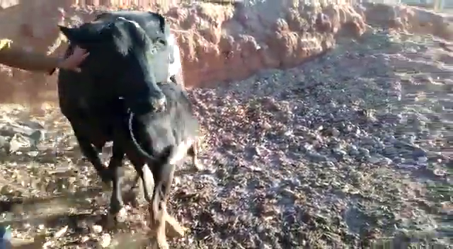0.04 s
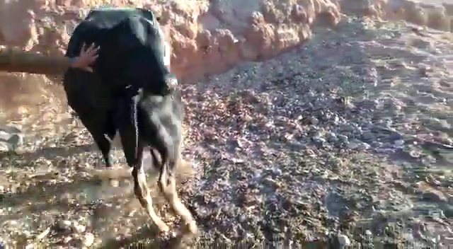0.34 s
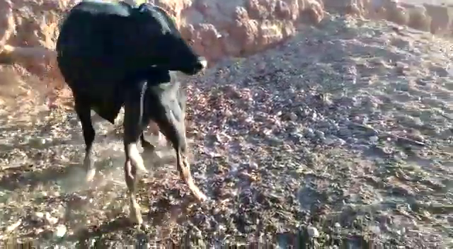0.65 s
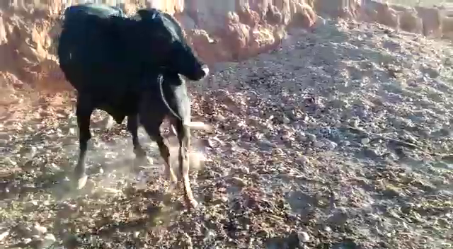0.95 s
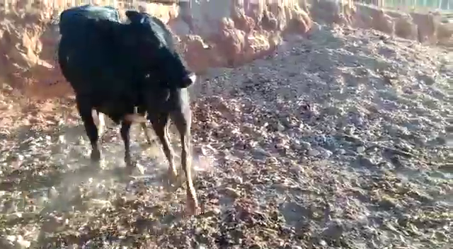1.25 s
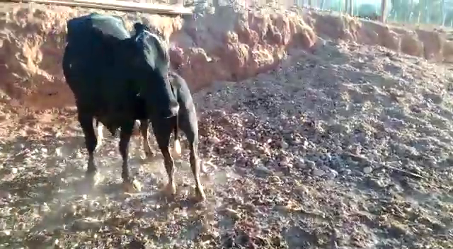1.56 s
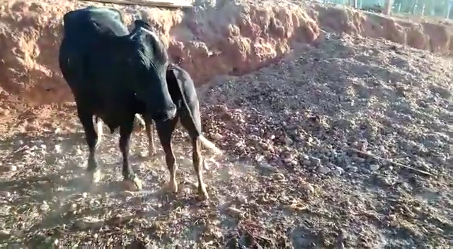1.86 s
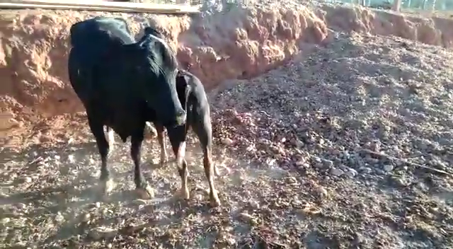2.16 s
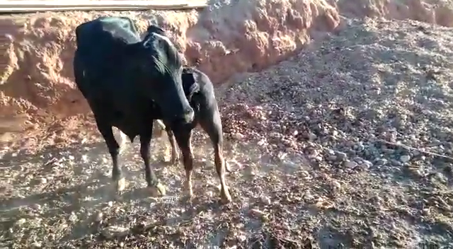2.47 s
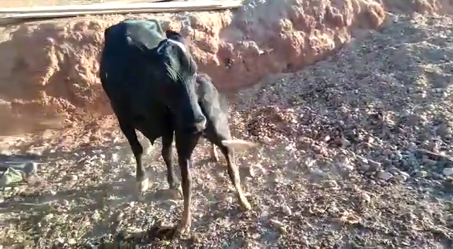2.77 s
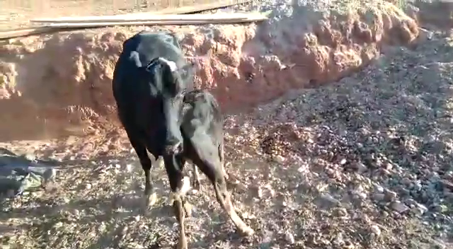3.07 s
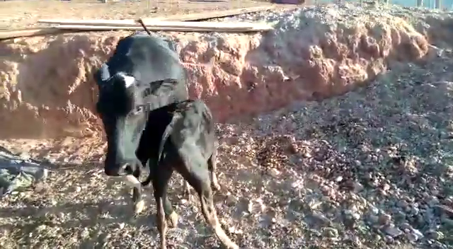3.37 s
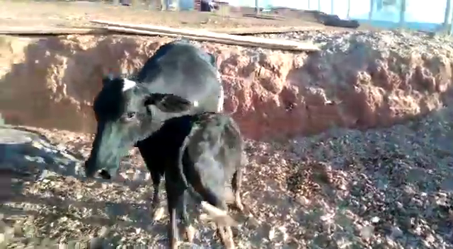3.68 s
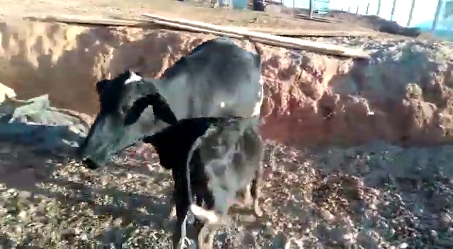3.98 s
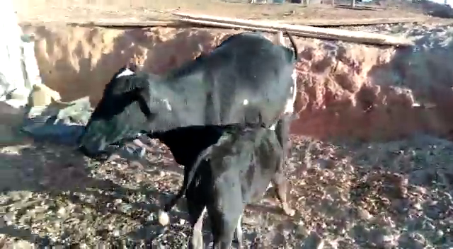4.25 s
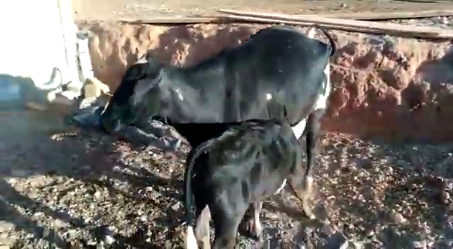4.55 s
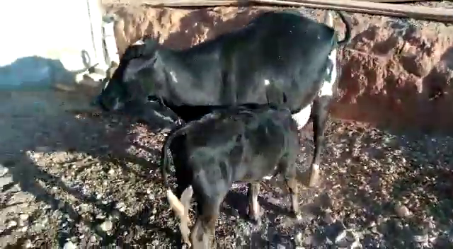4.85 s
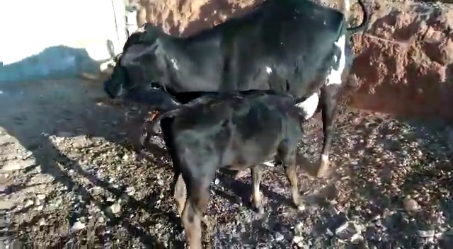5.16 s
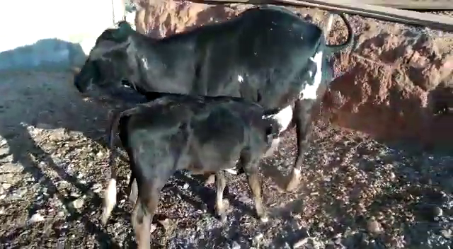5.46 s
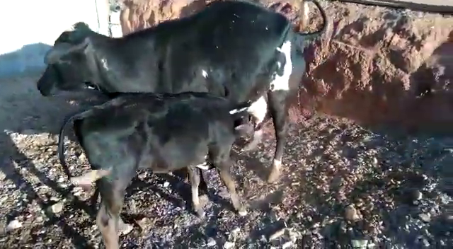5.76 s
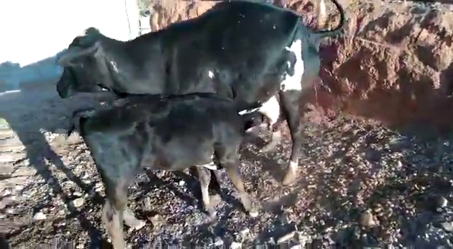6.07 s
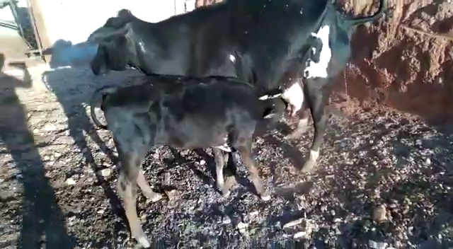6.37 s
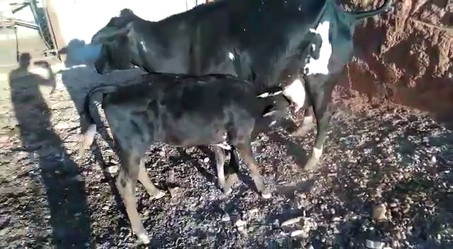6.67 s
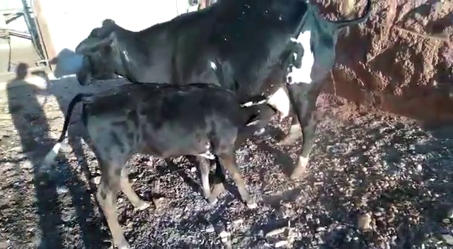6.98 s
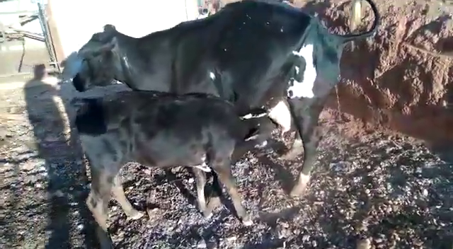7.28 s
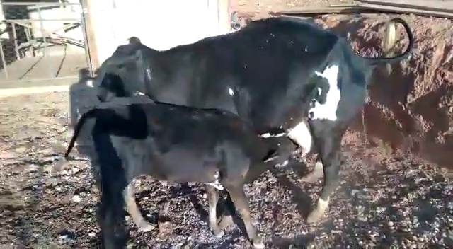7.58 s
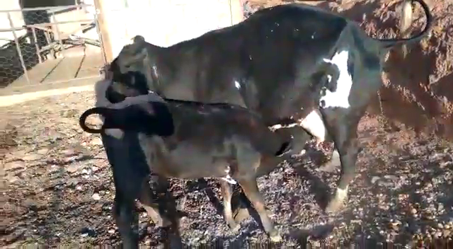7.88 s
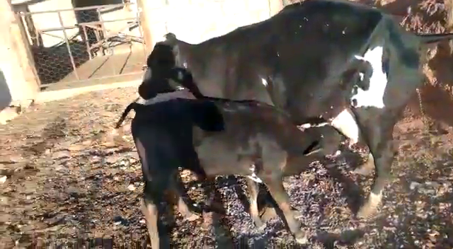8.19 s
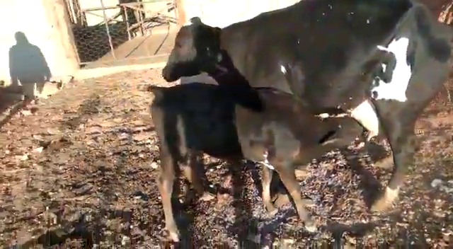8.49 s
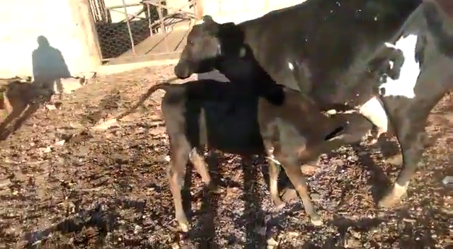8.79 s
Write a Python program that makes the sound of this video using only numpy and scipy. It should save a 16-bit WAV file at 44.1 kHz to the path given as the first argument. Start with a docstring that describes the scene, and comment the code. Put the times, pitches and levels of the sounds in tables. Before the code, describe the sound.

A cow and calf shuffle over crunching stones; late on, the cow lets out a single long, raspy moo with a shrill edge.

```python
"""Gravel grinds, crackles and snaps up close as a cow and her calf shuffle round a corral.
Hooves drag the stones against each other, dull thumps shake the microphone, a bird whistles far off.
Then the cow hums low through her nose and pushes out one long, hoarse moo: rough vocal-fold pulses
ring her throat and break from register to register, with a second, shrill vibration riding on top."""
import sys
import numpy as np
from scipy import signal
from scipy.fft import rfft, irfft
from scipy.io import wavfile
from scipy.ndimage import uniform_filter1d

SR = 44100
rng = np.random.default_rng(int(sys.argv[2]) if len(sys.argv) > 2 else 0)


def dump_mix(stems):
    """Bounce the given channels to the path in sys.argv[1] as a 16-bit WAV at rate SR."""
    frames = np.atleast_2d(stems).T  # one column per channel
    limited = np.clip(frames, -1, 1)  # hard clip at full scale
    pcm = np.round(limited * 32767).astype(np.int16)
    wavfile.write(sys.argv[1], SR, pcm)


N = 389403
TIME = np.arange(N) / SR

# open-air bed: f/Hz, level/dB
AIR_EQ = [(25, -8.5), (70, 17), (200, -18.5), (400, -27), (1500, -33), (3000, -69), (16000, -49)]
# rumble on the microphone: t/s, level/dB
RUMBLE_LEVELS = [(1.3, -49), (1.6, -55), (2.2, -46.5), (4.3, -52), (5.5, -46), (8.2, -52), (8.7, -49)]
# distant bird: t/s, length/s, first f/Hz, last f/Hz, level/dB, roughness/0-1
WHISTLES = [(0.247, 0.92, 1985, 1791, -47.5, 0.35), (1.651, 0.03, 1980, 1730, -38, .7),
            (1.714, 0.063, 1353, 1367, -37.5, 0.65), (1.876, 0.09, 1305, 1290, -38.5, 0.8),
            (3.76, .2, 3220, 3360, -52, .4)]
# dull thumps: t/s, level/dB
THUMPS = [(.141, -23.5), (.297, -31), (0.399, -33), (0.429, -27.5), (0.876, -38), (0.944, -35),
          (1.078, -28), (2.073, -33), (2.243, -22.5), (2.359, -23), (2.499, -26.5), (2.603, -26),
          (2.692, -23.5), (2.841, -26), (3.098, -32), (3.165, -29.5), (3.222, -29.5), (3.373, -32),
          (3.412, -29), (3.702, -25), (3.784, -31.5), (3.874, -26), (4.305, -32), (4.823, -22),
          (4.882, -29), (4.954, -26), (5.049, -21), (5.158, -26), (5.984, -24.5), (6.041, -25),
          (6.315, -23.5), (6.35, -26.5), (6.768, -28), (6.82, -24.5), (6.843, -23), (6.902, -23),
          (6.947, -24), (6.995, -26), (7.042, -27), (7.607, -28.5), (7.699, -23), (7.914, -33),
          (7.973, -24.5), (8.578, -32.5)]

# a hoof bears down and drags: t/s, length/s, grind level/dB, crunch level/dB
HOOF_DRAGS = [(0, 1.43, -44.5, -44.5), (0.164, 0.14, -43, -37.5), (1.549, 0.0076, -42.5, -49.5),
              (1.875, 0.17, -42.5, -61), (2.025, 0.27, -46.5, -55), (2.646, 0.16, -48.5, -47.5),
              (2.828, 0.18, -43.5, -51.5), (3.219, 0.11, -48.5, -58.5), (3.523, 0.027, -60, -44),
              (3.66, 0.43, -51, -46.5), (3.844, 0.039, -46, -48.5), (4.208, 6.5, -49, -44.5),
              (4.668, 0.48, -67, -47), (5.399, 0.11, -45.5, -43.5), (8.206, 0.6, -48, -41.5)]
# tone of grinding stones, crunching pebbles and fizzing grit: f/Hz, level/dB
GRIND_EQ = [(200, -14), (450, -5), (700, -4), (1450, 4.5), (1950, 1.5), (2600, -57), (5000, -28),
            (9000, -62)]
CRUNCH_EQ = [(450, -8), (700, -5.5), (2000, -0.5), (3200, -3), (5500, -1), (7200, -4.5), (10000, -14),
             (16000, -66)]
FIZZ_EQ = [(5000, -25), (8500, -5), (11000, -3.5), (14000, 0), (15800, -1.5), (16300, -20)]
# ring of the stones underfoot: t/s, f/Hz
STONE_RING = [(2.8, 6750), (5.1, 3780), (5.9, 4560), (8.7, 3980)]
# high gritty fizz relative to the crunch; it goes dull from about 1.6 to 3.5 s: t/s, level/dB
FIZZ_LEVELS = [(1.57, -4), (1.7, -15), (3.45, -17), (3.55, -3), (5, -5), (6.3, -1.5), (8.3, -7)]
# hoof scuffs: t/s, length/s, level/dB, centre f/Hz
SCUFFS = [(0.526, 0.08, -31.5, 2290), (0.772, 0.0086, -30, 1990), (1.118, 0.047, -36.5, 1600),
          (1.223, 0.011, -34, 2080), (3.013, .012, -37.5, 1400), (3.3, 0.015, -38, 1120),
          (3.642, 0.046, -33, 1160), (3.969, 0.035, -34.5, 1720), (4.861, 0.0075, -27.5, 3250),
          (5.127, 0.019, -30, 3800), (5.167, 0.0051, -29, 3120), (5.195, 0.023, -32.5, 3440),
          (5.266, 0.0041, -27.5, 3450), (5.289, 0.0085, -32, 3000), (6.225, 0.01, -26, 3380),
          (6.649, .013, -30, 3150), (8.109, 0.051, -26, 5700), (8.72, 0.028, -28.5, 3530)]
# stones snapping: t/s, dry peak level/dB, centre f/Hz
SNAPS = [(.0605, -11, 5700), (.1725, -13, 4000), (.584, -17, 1800), (.72, -15, 7900), (.804, -20, 1600),
         (1.041, -21, 2600), (1.115, -20, 1400), (1.555, -24, 1800), (2.152, -14, 1250), (2.861, -22, 1800),
         (2.903, -21, 1400), (3.525, -22, 10500), (3.656, -19, 1000), (4.683, -18, 4000),
         (4.861, -19, 5300), (5.263, -18, 3300), (5.927, -4, 12000), (7.818, -18, 4500), (7.861, -17, 5300),
         (8.052, -17, 5300), (8.504, -15, 4000), (8.535, -17, 4000)]

# closed-mouth hum: t/s, pitch f/Hz, level/dB
HUM_CURVE = [(5.4, 58.7, -57), (5.801, 61.46, -45.5), (6.15, 63.9, -61)]
# tone of the nose and of the throat: f/Hz, level/dB
NOSE_EQ = [(60, -12), (125, 11.5), (350, -6), (860, 5), (1100, -52)]
THROAT_EQ = [(150, -27.5), (260, -19), (350, -52), (500, -14), (570, 1), (700, -2.5), (930, 4.5),
             (1170, 5.5), (1330, -7.5), (1520, 7), (1710, -5.5), (1880, 2), (2200, -11.5), (3200, -23.5),
             (6000, -75)]
# upper throat resonances that ring when she strains: f/Hz, width/Hz, level/dB
BRASS_FORMANTS = [(1860, 110, 6), (2040, 80, 5), (2433, 85, 0), (3100, 83, -6)]
# registers the voice breaks into:
# t/s, top pitch f/Hz, second oscillator/pitch, roughness/0-1, sideband level/dB, brass level/dB
REGISTERS = [(6.13, 290, 4.15, .9, -15, -28), (6.3, 322, 3.74, .25, -12, -19), (6.42, 279, 4, .25, -8, -8),
             (6.475, 285, 4.4, .9, -6, -13), (6.505, 291, 3.99, .08, -13, -14),
             (6.57, 287, 3.7, .58, -2, -14), (6.81, 278, 3.4, .58, -7, -20),
             (7.02, 277, 3.53, .42, -1, -21), (7.3, 269, 3.55, .47, -7, -21),
             (7.44, 255, 4.68, .7, -9, -20)]
# lines around the second oscillator: offset/half-pitch steps, level/dB
SIDEBANDS = [(-3, -8), (-1, -10), (1, 0), (2, -12), (4, -6)]

EDGE_HZ = 16300
MOO_START_S, MOO_END_S, BUILD_S, LET_GO_S = 6.14, 7.61, .26, .17  # one push: build, hold, let go


def gain_of(db):
    """Decibels to amplitude."""
    return 10 ** (np.asarray(db) / 20)


def unit_rms(x):
    """Scales to rms 1."""
    return x / np.sqrt(np.mean(x ** 2) + 1e-20)


def follow(rows, t):
    """Reads each column of a breakpoint curve at t."""
    s, *columns = np.transpose(rows)
    return [np.interp(t, s, c) for c in columns]


def add(mix, s, sound):
    """Mixes a sound in at s seconds."""
    part = mix[max(round(s * SR), 0):][:len(sound)]
    part += sound[:len(part)]


def eq(x, points):
    """Minimum-phase EQ through the (f/Hz, level/dB) points."""
    f, db = np.transpose(points)
    hz = abs(np.fft.fftfreq(4096, 1 / SR))
    log_gain = np.log(gain_of(np.interp(np.log(hz + 1), np.log(f), db)))
    taps = np.fft.ifft(np.exp(np.conj(signal.hilbert(log_gain)))).real
    return signal.oaconvolve(x, taps[:len(taps) // 2])[:len(x)]


def band(x, lo_hz, hi_hz, order=2):
    """Band-pass."""
    sos = signal.butter(order, [lo_hz, min(hi_hz, SR / 2 - 100)], "band", fs=SR, output="sos")
    return signal.sosfilt(sos, x)


def wander(size, rate_hz):
    """Smooth random modulation of rms 1."""
    hz = np.fft.rfftfreq(size, 1 / SR)
    return unit_rms(irfft(rfft(rng.standard_normal(size)) / (1 + (hz / rate_hz) ** 2), size))


def resonate(x, hz, width_hz):
    """A moving resonance of gain 1."""
    turn = np.exp(2j * np.pi * np.cumsum(hz) / SR)
    pole = np.exp(-np.pi * width_hz / SR)
    return 2 * (turn * signal.lfilter([1 - pole], [1, -pole], x / turn)).real


def yard(x, wet_db, t60):
    """Short reverb: scatter from the ground, the earth bank and the walls."""
    t = TIME[:SR // 2]
    echoes = rng.standard_normal(len(t)) * (rng.random(len(t)) < .1)
    tail = echoes * gain_of(-60 * t / t60) * (t > .002)
    return x + gain_of(wet_db) * signal.oaconvolve(x, tail / np.linalg.norm(tail))[:len(x)]


def air():
    """A faint open-air bed, with spells of small, rumbling knocks on the microphone."""
    knocks = rng.uniform(-1, 1, N) * (rng.random(N) < 26 / SR)
    lumps = unit_rms(knocks) + .35 * rng.standard_normal(N)
    spells = unit_rms(gain_of(6 * np.clip(wander(N, rate_hz=9), -2, 1)))
    rumble = unit_rms(band(lumps, 46, 160, order=3)) * gain_of(follow(RUMBLE_LEVELS, TIME)[0]) * spells
    return gain_of(-51) * unit_rms(eq(rng.standard_normal(N), AIR_EQ)) + rumble


def bird():
    """Thin gliding whistles and short rough notes from far away."""
    out = np.zeros(N)
    for s, length, first_hz, last_hz, db, rough in WHISTLES:
        size = int(length * SR)
        hz = np.linspace(first_hz, last_hz, size) * (1 + .035 * rough * wander(size, rate_hz=150))
        envelope = gain_of(db + 3 * wander(size, rate_hz=25)) * signal.windows.tukey(size, .2)
        add(out, s, envelope * np.sin(2 * np.pi * np.cumsum(hz) / SR))
    return yard(out, wet_db=-7, t60=.2)


def thumps():
    """Blunt pushes on the microphone, each with a little scrape and a ring that dives into the bass."""
    out, t = np.zeros(N), TIME[:SR // 5]
    swell = (1 - np.exp(-t / .002)) ** 2 * (np.exp(-t / .016) + .057 * np.exp(-t / .098))
    for s, db in THUMPS:
        start_hz, rest_hz = 295 * rng.uniform(.67, 1.26), 72 * rng.uniform(.89, 1.104)
        dive_s = rng.uniform(.0034, .0077)
        turns = np.cumsum(rest_hz + (start_hz - rest_hz) * np.exp(-t / dive_s)) / SR
        scrape = rng.uniform(.08, .3) * unit_rms(band(rng.standard_normal(len(t)), 130, 320, order=3))
        add(out, s, gain_of(db) * swell / swell.max() * (scrape - np.sin(2 * np.pi * turns)))
    return out


def hoof_pressure():
    """Grind and crunch levels in dB: stones catch at once, hold, and settle as the weight comes off."""
    bite_s, settle_db_per_s = .00036, 392
    power = gain_of([[-62], [-73]]) ** 2 * np.ones(N)  # grind and crunch under standing hooves
    for s, length, *levels_db in HOOF_DRAGS:
        t = np.arange(0, length + .5, 1 / SR)
        envelope = np.minimum(t / bite_s, 1) * gain_of(-settle_db_per_s * np.maximum(t - length, 0))
        for layer, db in zip(power, levels_db):
            add(layer, s, (gain_of(db) * envelope) ** 2)
    return 10 * np.log10(power)


def grains(per_s, spread_db, clump_db, wash_db, centre_hz):
    """Tiny stone contacts in clumps, each stone size with its own short ring, over a smooth wash."""
    hit_db = spread_db * np.minimum(rng.exponential(1, N), 4)
    hit_db += clump_db * np.clip(wander(N, rate_hz=100), -2, 2)
    clicks = gain_of(hit_db) * rng.choice([-1, 1], N) * (rng.random(N) < per_s / SR)
    stone_size = rng.integers(0, 20, N)
    out, t = np.zeros(N), TIME[:SR // 100]
    attack = 1 - np.exp(-t / .0005)
    for k, hz in enumerate(np.minimum(centre_hz * np.geomspace(.5, 2, 20), EDGE_HZ)):
        ring = np.sin(2 * np.pi * hz * t) * np.exp(-t * hz / 2)
        scratch = .32 * rng.standard_normal(len(t)) * np.exp(-t / .0027)
        out += signal.oaconvolve(clicks * (stone_size == k), unit_rms((ring + scratch) * attack))[:N]
    return unit_rms(out) + gain_of(wash_db) * rng.standard_normal(N)


def gravel():
    """Coarse stones grind, pebbles crunch, grit fizzes; one jerky hoof pressure drives them all."""
    grind_db, crunch_db = hoof_pressure()
    fizz_db = crunch_db + follow(FIZZ_LEVELS, TIME)[0]
    jerk = np.clip(wander(N, rate_hz=23), -2, 2)
    stones = grains(per_s=900, spread_db=2.5, clump_db=4.5, wash_db=1.5, centre_hz=1290)
    pebbles = grains(per_s=520, spread_db=3.7, clump_db=2, wash_db=-6, centre_hz=4330)
    grit = grains(per_s=580, spread_db=6, clump_db=-.5, wash_db=-12, centre_hz=11840)
    pebbles = eq(pebbles, CRUNCH_EQ)
    ring = resonate(pebbles, follow(STONE_RING, TIME)[0], width_hz=3950)
    grind = unit_rms(eq(stones, GRIND_EQ)) * gain_of(grind_db + 1.4 * jerk)
    crunch = unit_rms(pebbles + 10 * ring) * gain_of(crunch_db + 1.7 * jerk)
    fizz = unit_rms(eq(grit, FIZZ_EQ)) * gain_of(fizz_db + 3.2 * jerk)
    return yard(grind + crunch + fizz, wet_db=-7.5, t60=.31)


def scuffs():
    """A hoof shoves a handful of stones at once: a short, rattling band of noise."""
    out, spread = np.zeros(N), .38  # half-width / centre
    for s, length, db, hz in SCUFFS:
        u = TIME[:int(2 * length * SR)] / length
        rattle = rng.standard_normal(len(u)) * gain_of(6.1 * wander(len(u), rate_hz=170))
        rattle = unit_rms(band(rattle, hz * (1 - spread), hz * (1 + spread)))
        envelope = (1 - np.exp(-u / .041)) * np.exp(-u ** 2 * 1.13)
        add(out, s, gain_of(db) * rattle * envelope)
    return out


def snaps():
    """A stone cracks against another and settles for a few milliseconds."""
    out, t = np.zeros(N), TIME[:SR // 20]
    for s, db, hz in SNAPS:
        crack = .3 * rng.standard_normal(len(t)) * (np.exp(-t / .0007) + .22 * np.exp(-t / .006))
        crack[0] = 2  # hard transient
        snap = band(crack, hz / 1.35, hz * 1.4) + .04 * crack
        add(out, s, gain_of(db) * snap / abs(snap).max())
    return yard(out, wet_db=-9, t60=.12)


def hum():
    """Slow, even fold pulses heard through the nose, creeping up in pitch towards the moo."""
    t = np.arange(HUM_CURVE[0][0], HUM_CURVE[-1][0], 1 / SR)
    hz, db = follow(HUM_CURVE, t)
    turns = np.cumsum(hz * (1 + .0033 * wander(len(t), rate_hz=20))) / SR
    tone = sum(gain_of(follow(NOSE_EQ, k * hz)[0]) * np.cos(2 * np.pi * k * turns) for k in range(1, 19))
    out = np.zeros(N)
    add(out, t[0], gain_of(db) * unit_rms(tone) * signal.windows.tukey(len(t), .2))
    return out


def eased(u):
    """A smooth step from 0 to 1 as u goes from 0 to 1."""
    return np.sin(np.pi / 2 * np.clip(u, 0, 1)) ** 2


def moo_controls(t):
    """Strain lifts pitch and level; the pitch sags within a register and the folds rasp at each break."""
    slack_pitch, slack_rough, slack_db = .66, .7, -15  # with no strain; pitch as a share of the top
    sag_per_s, steady_s, slip_s = .06, .1, .016
    strain = eased((t - MOO_START_S) / BUILD_S) * eased((MOO_END_S - t) / LET_GO_S)
    breaks = [row[0] for row in REGISTERS[1:]]
    entry_s, top_hz, ratio, rough, sideband_db, brass_db = np.array(REGISTERS)[np.searchsorted(breaks, t)].T
    sag = sag_per_s * (t - entry_s)
    hz = top_hz * (1 - sag) * (slack_pitch + (1 - slack_pitch) * strain)
    second_hz = ratio * top_hz * (1 - sag / 2)
    to_break_s = np.min([abs(t - s) for s in breaks + [MOO_END_S - LET_GO_S]], axis=0)
    rough = rough + .17 * np.exp(-to_break_s / steady_s)
    rough = np.clip(slack_rough + (rough - slack_rough) * strain ** 2, 0, 1)
    fade = eased(1 - 2 * (MOO_END_S - t) / LET_GO_S)
    effort_db = -21.4 + slack_db * (1 - strain) - 3 * rough - 18 * fade
    controls = np.array([hz, second_hz, rough, sideband_db, brass_db, effort_db])
    return uniform_filter1d(controls, int(slip_s * SR), axis=1)


def vocal_folds(buzz, turns, rough):
    """Buzzing pulses, with chaotic slaps and a puff of noise about every second cycle."""
    size = len(turns)
    slaps = np.diff(np.floor(turns / 2 + .3 * wander(size, rate_hz=70)), prepend=0) > 0
    puffs = (.27 + np.exp(-(turns / 2 % 1))) * rng.standard_normal(size)
    rasp = unit_rms(unit_rms(slaps - slaps.mean()) + unit_rms(puffs))
    # the folds flutter unevenly, about every fourth cycle
    flutter = 1 + .45 * np.cos(2 * np.pi * (turns / 4 + .25 * wander(size, rate_hz=25)))
    return (.42 * buzz + (.1 + .75 * rough) * rasp) * flutter


def throat(drive, buzz, buzz_hz, second_hz, brass_db):
    """The throat never holds still: drifting resonances colour the folds, brassier as she strains."""
    drift = 1 + .013 * wander(len(drive), rate_hz=5.8)
    body = eq(drive, THROAT_EQ)
    shrill = np.interp(buzz_hz, [225, 265], [2, .4]) * resonate(body, second_hz * drift, width_hz=90)
    octave = 1.4 * resonate(body, 2.07 * buzz_hz, width_hz=30)
    brass = sum(gain_of(db) * resonate(resonate(drive + buzz, f * drift, width), f * drift, width)
                for f, width, db in BRASS_FORMANTS)
    return unit_rms(body + shrill + octave) + gain_of(brass_db) * unit_rms(brass)


def second_oscillator(hz, fold_turns, rough, sideband_db):
    """A shrill vibration that comes and goes, beating with the folds into wavering sidebands."""
    size = len(hz)
    turns = np.cumsum(hz * (1 + .012 * rough * wander(size, rate_hz=70))) / SR
    lines = np.cos(2 * np.pi * turns)
    for k, db in SIDEBANDS:
        level = gain_of(db + sideband_db + 6 * rough * wander(size, rate_hz=25))
        lines += level * np.cos(2 * np.pi * (turns + k * fold_turns / 2 + rng.random()))
    waver_db = 2 * np.clip(wander(size, rate_hz=22), -2, 1)
    return unit_rms(lines * gain_of(waver_db))


def moo():
    """One long call: hoarse folds through the throat, the shrill second oscillator and a chest tone."""
    t = np.arange(MOO_START_S, MOO_END_S, 1 / SR)
    hz, second_hz, rough, sideband_db, brass_db, effort_db = moo_controls(t)
    turns = np.cumsum(hz * (1 + .006 * rough * wander(len(t), rate_hz=35))) / SR
    ragged = turns + .035 * rough * wander(len(t), rate_hz=90)
    buzz = unit_rms(sum(np.cos(2 * np.pi * k * ragged) for k in range(1, 20)))
    hoarse = throat(vocal_folds(buzz, turns, rough), buzz, hz, second_hz, brass_db)
    shrill = second_oscillator(second_hz, turns, rough, sideband_db)
    # steadier folds let the shrill lines and the chest octave ring out of the rasp
    clean = np.clip(1 - .78 * rough, 0, 1)
    octave = .2 * clean * np.cos(4 * np.pi * ragged)
    # the chest tone shows at low pitch, as the call opens and closes
    chest = gain_of(np.interp(hz, [200, 267, 285], [-17, -31, -38])) * np.cos(2 * np.pi * turns)
    voice = np.sqrt(1 - .7 * clean ** 2) * hoarse + clean * shrill + chest + octave
    out = np.zeros(N)
    add(out, t[0], gain_of(effort_db) * voice * signal.windows.tukey(len(t), .08))
    return yard(out, wet_db=-9, t60=.25)


def scene():
    """The mono mix of cow, hooves and background."""
    return (hum() + moo() + gravel() + snaps() + scuffs() + thumps() + air() + bird())[None]


def record(dry):
    """A steep low-pass trims the very top."""
    low_pass = signal.firwin(511, EDGE_HZ, window=("kaiser", 9), fs=SR)
    return signal.oaconvolve(dry, low_pass[None], "same")


dry = scene()
out = record(dry)
dump_mix(out)
```